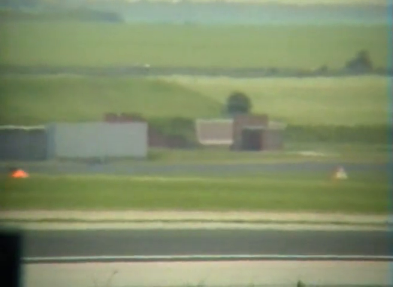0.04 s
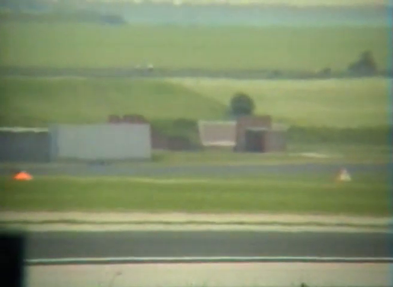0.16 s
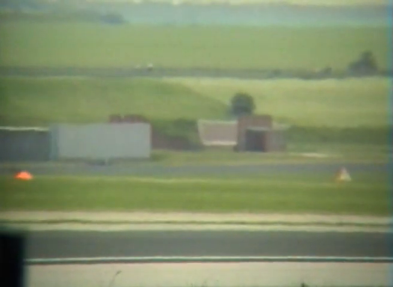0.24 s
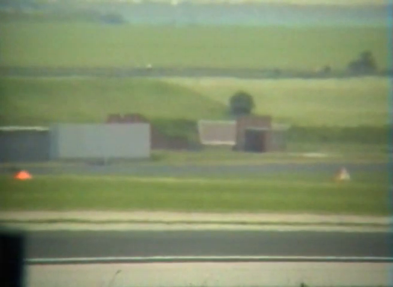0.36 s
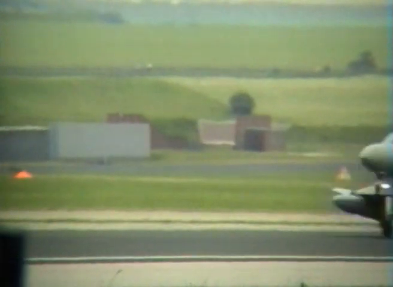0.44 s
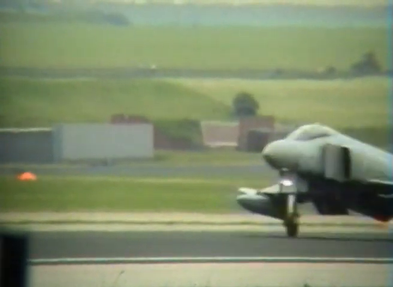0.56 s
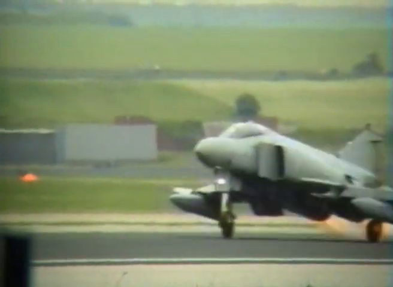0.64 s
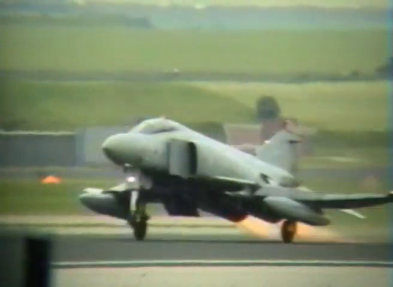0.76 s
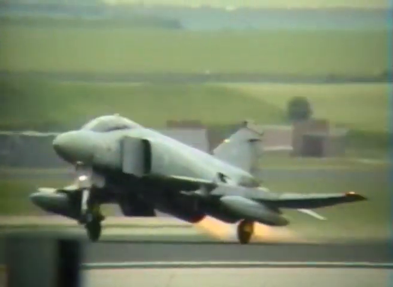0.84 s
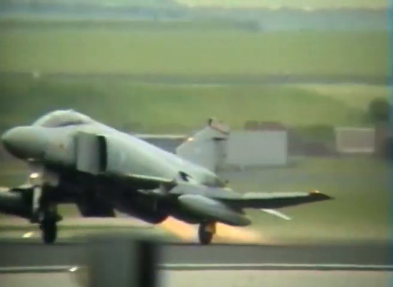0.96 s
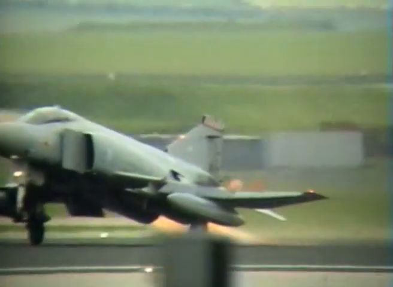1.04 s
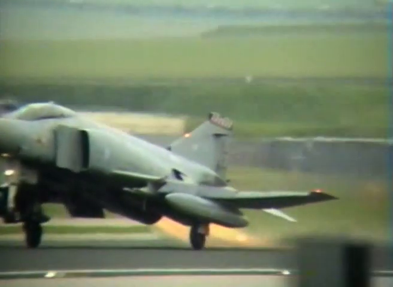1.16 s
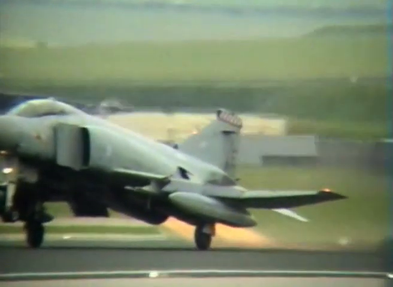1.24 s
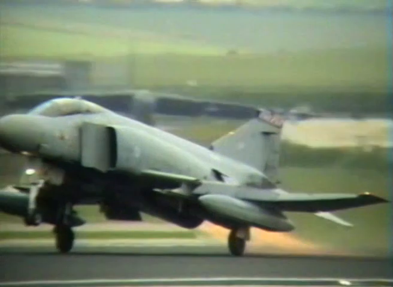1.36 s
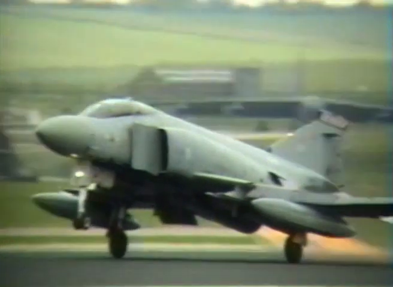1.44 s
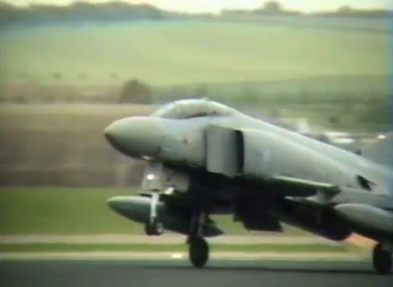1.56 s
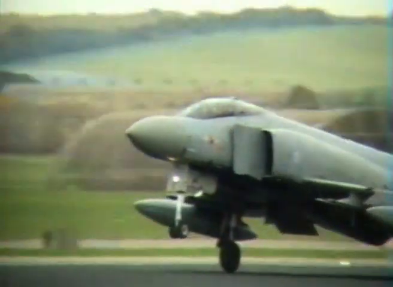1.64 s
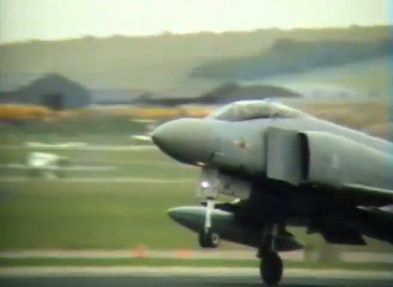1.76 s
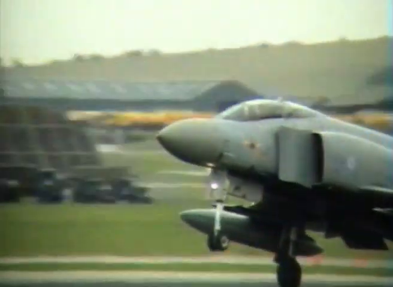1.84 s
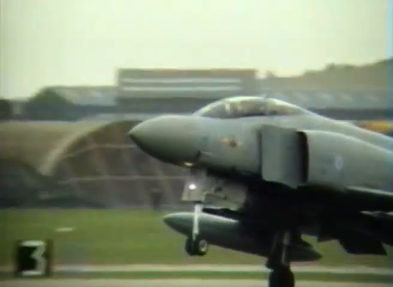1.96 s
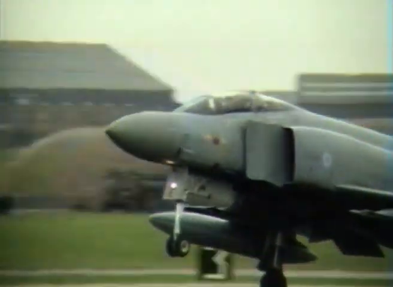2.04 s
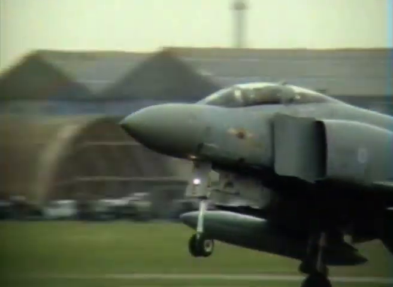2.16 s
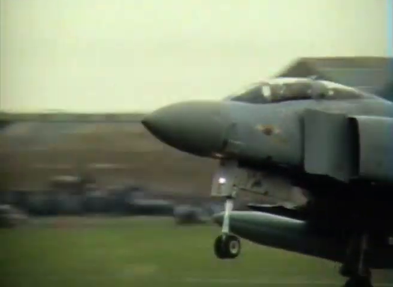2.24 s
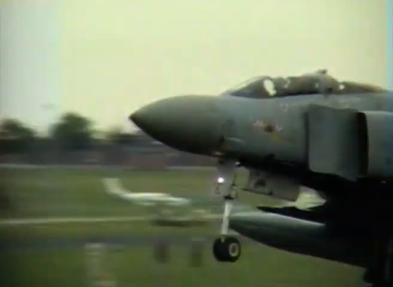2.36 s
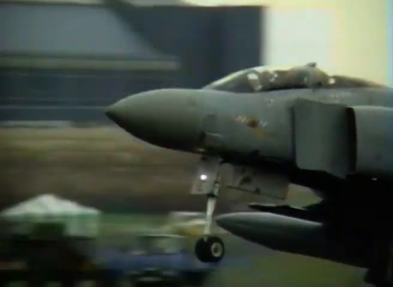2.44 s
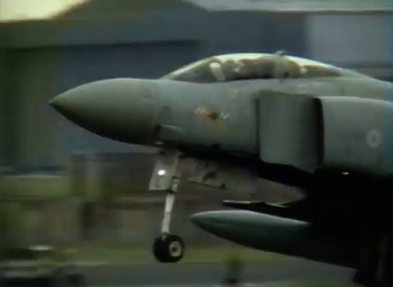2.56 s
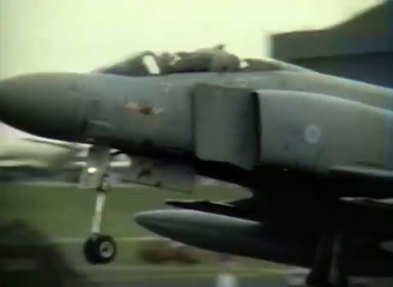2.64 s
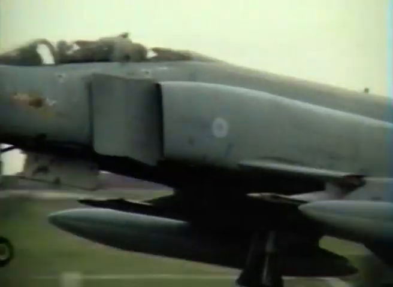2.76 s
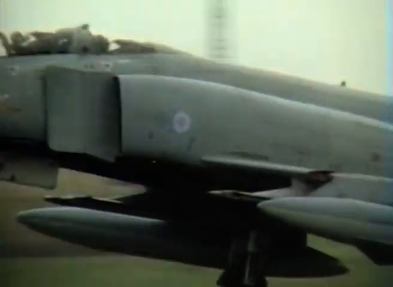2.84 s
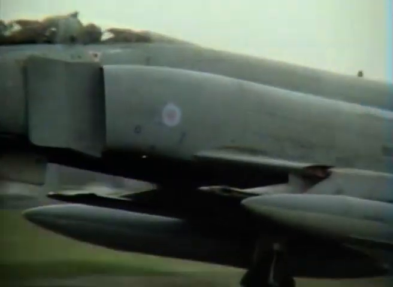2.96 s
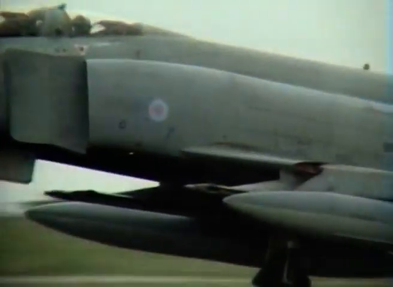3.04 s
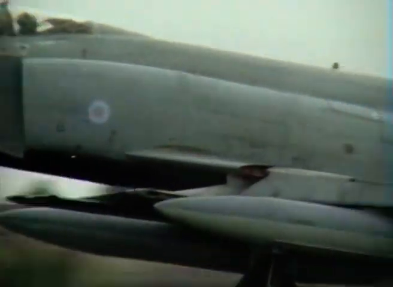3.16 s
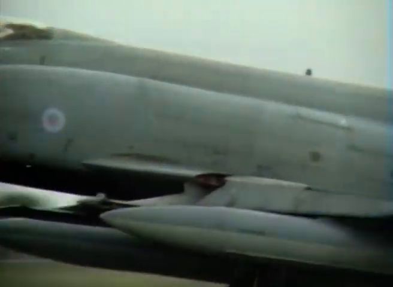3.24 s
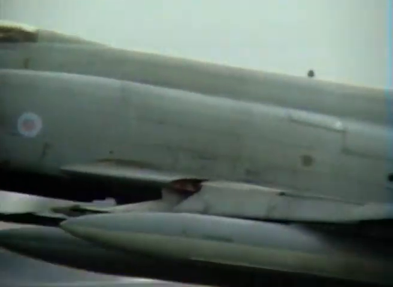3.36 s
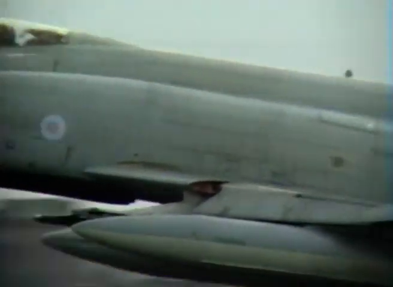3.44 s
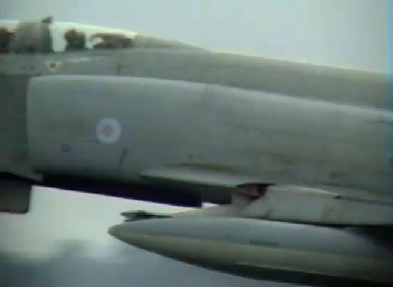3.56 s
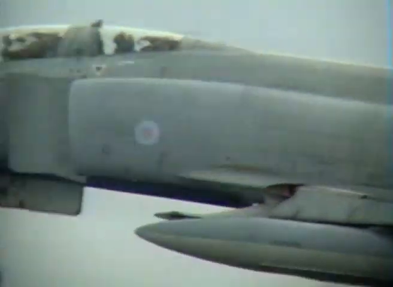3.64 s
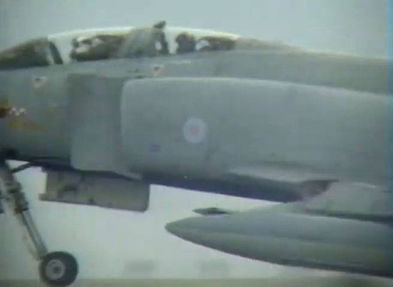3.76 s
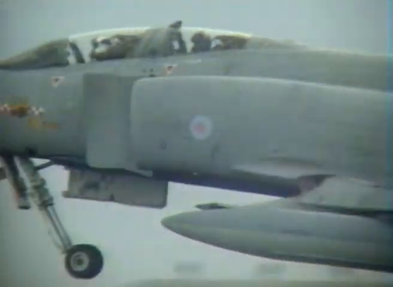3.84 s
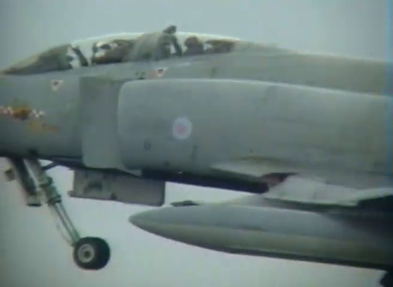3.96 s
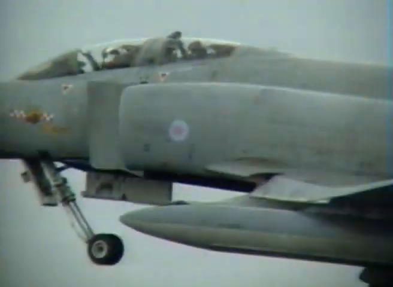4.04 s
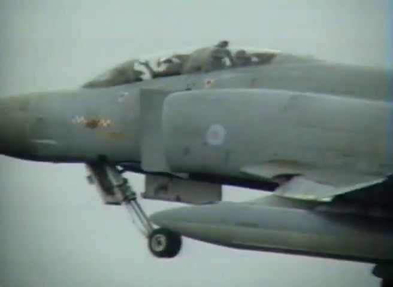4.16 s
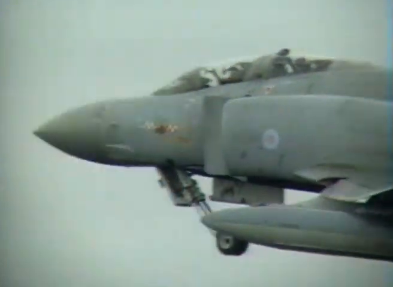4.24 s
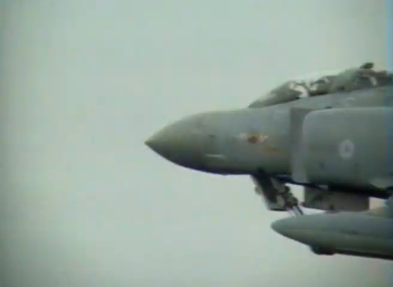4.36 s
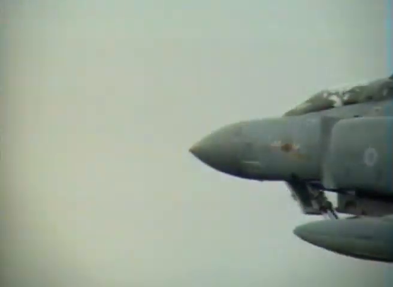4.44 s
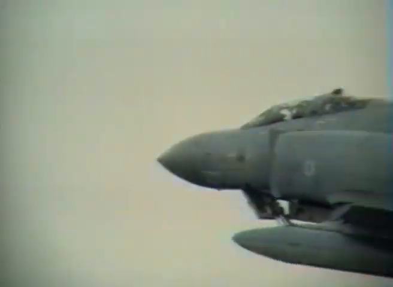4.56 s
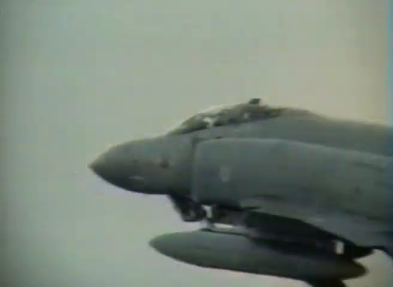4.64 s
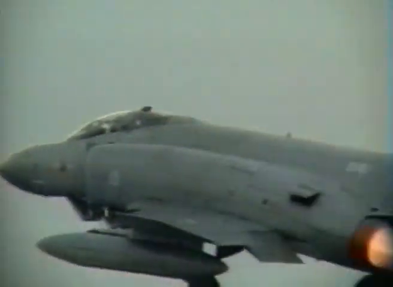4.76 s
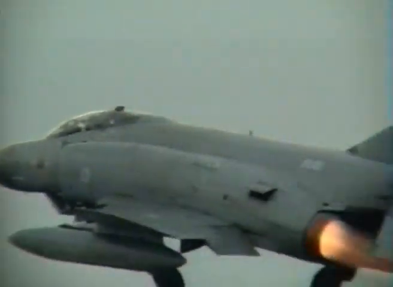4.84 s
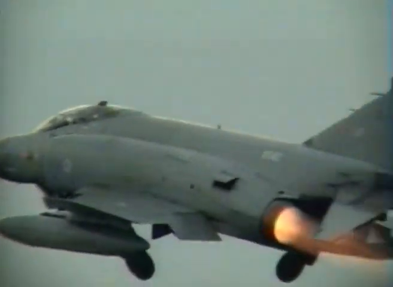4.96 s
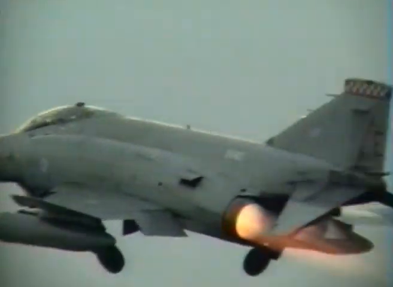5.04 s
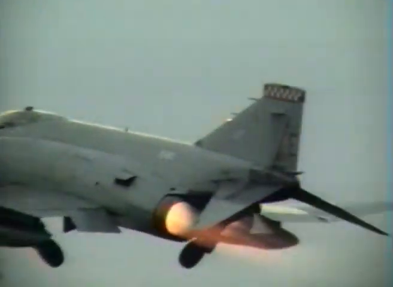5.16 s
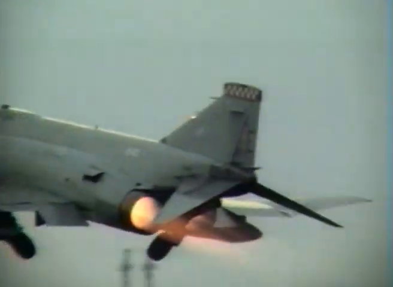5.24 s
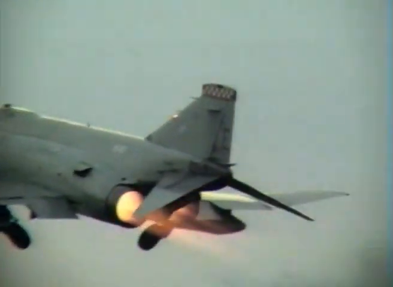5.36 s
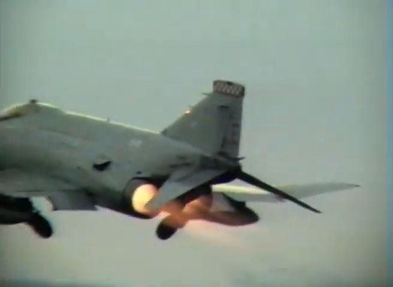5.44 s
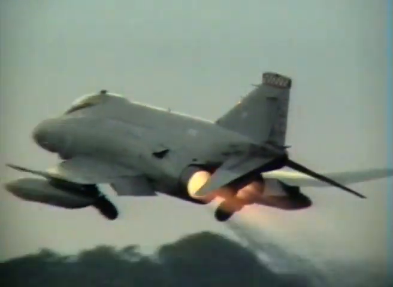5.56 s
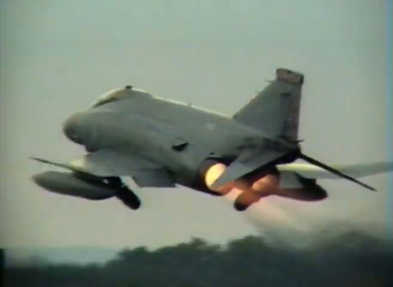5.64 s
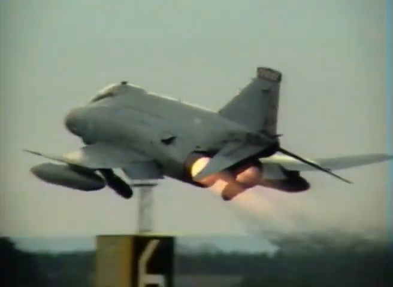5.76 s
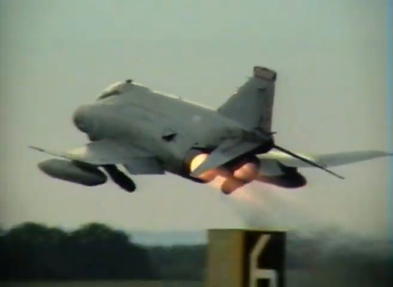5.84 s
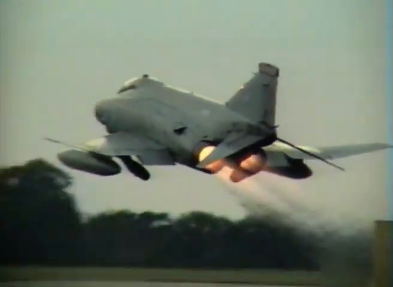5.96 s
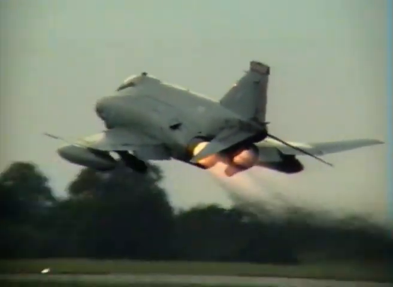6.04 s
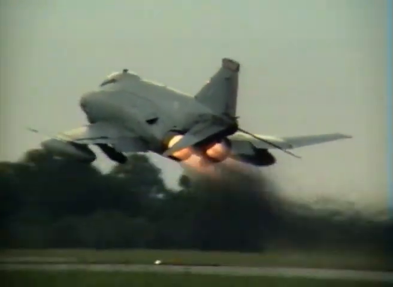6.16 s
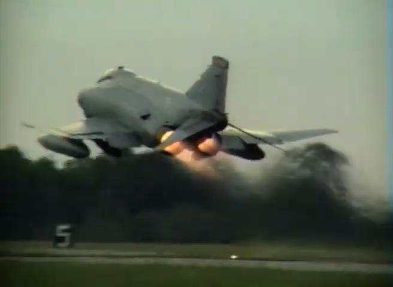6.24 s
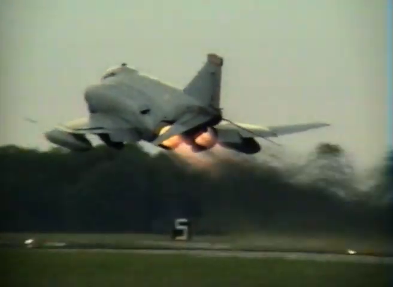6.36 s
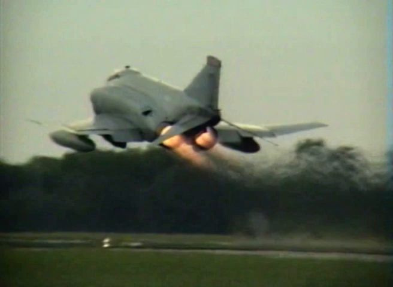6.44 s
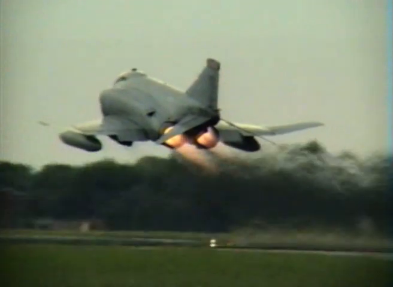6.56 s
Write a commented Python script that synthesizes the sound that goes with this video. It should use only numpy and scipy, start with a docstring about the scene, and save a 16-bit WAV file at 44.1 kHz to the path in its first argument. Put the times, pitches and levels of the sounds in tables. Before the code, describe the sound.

A fighter jet on afterburner takeoff swells from a thin distant rush to a huge crackling roar, passes close, then turns hollow and recedes.

```python
"""Afterburner take-off and close pass

A jet fighter takes off in afterburner, passes close by and climbs away. Filtered noise and random shocks
form the roar: thin ahead, full and crackling to the side and behind, hollow straight astern; it surges in
uneven air. The exhaust rumbles as low noise, an unsteady sine burner tone drops in pitch, mid-band noise
swells briefly and single shocks crack. Two spaced pickups, summed, comb the rumble, roar and cracks.
Steady low ambient rumble with faint hiss lies beneath; the recorder puts treble left, bass right."""
import sys
import numpy as np
from scipy import signal
from scipy.fft import rfft, irfft
from scipy.io import wavfile
from scipy.ndimage import map_coordinates

SR = 44100
rng = np.random.default_rng(int(sys.argv[2]) if len(sys.argv) > 2 else 0)


def persist_wave(psi):
    """Save psi, clipped to +-1, as 16-bit WAV."""
    counts = np.round(np.clip(psi, -1, 1) * 32767).astype(np.int16)
    wavfile.write(sys.argv[1], SR, np.atleast_2d(counts).T)


N = 291060
TIME_S = np.arange(N) / SR

# Rumble source spectrum: f/Hz, relative level/dB
RUMBLE_SPECTRUM = [(25, -39), (45, -27), (65, -25), (90, -1.5), (130, 3.5), (190, 3), (300, -2.5),
                   (480, -5), (590, -22.5), (900, -18.5), (2000, -65)]
# Rumble swells and lulls: t/s, length/s, level/dB
RUMBLE_SWELLS = [(1.65, .22, 1.5), (2.3, 0.61, -1), (3.82, 0.35, -7.5), (4.31, 0.081, 2.5),
                 (4.7, 0.038, 2.5), (4.95, .15, -1.5), (5.46, 0.047, 2.5), (5.61, 0.059, -3.5),
                 (6.3, 0.07, -4)]
# Roar source spectrum: f/Hz, relative level/dB
ROAR_SPECTRUM = [(200, -21), (480, -3.5), (640, -4), (850, -2.5), (1150, 0.5), (1550, 2), (2300, 2.5),
                 (3000, -0.24), (4000, -7.5), (5000, -16), (6500, -22), (9500, -28.5), (11200, -37.5),
                 (13500, -48)]
# Roar surges and lulls: t/s, length/s, level/dB, brightness/dB
ROAR_SURGES = [(1.1, 0.42, 2, -1.2), (2.05, 0.1, -1.5, 3.5), (2.33, 0.062, 2.5, -3), (2.65, 0.045, 3, 0.5),
               (2.77, 0.17, 5.5, 2), (3.16, 0.13, 3.5, -0.5), (3.28, 0.13, 5.5, 3.5),
               (3.375, 0.13, 0, -3.5), (3.65, 0.13, -3, 0), (3.755, 0.063, 2, 2.5), (3.9, 0.18, -5, -2.5),
               (4.01, 0.069, 1, -1.5), (4.11, 0.08, 2.5, -1), (4.22, .1, -1, 0.5), (4.35, 0.14, -3, 2.5),
               (4.51, 0.09, 2, 2.5), (4.69, 0.084, 4, 2.5), (4.99, 0.083, -4, 0.5), (5.26, 0.13, 2.5, 1),
               (5.46, 0.086, 4.5, 2.5), (5.57, 0.18, -3, -1), (5.73, 0.15, 4.5, 0), (5.97, 0.14, 2.5, 0)]
# Burner tone mean pitch: t/s, f/Hz
TONE_PITCH = [(0, 146.3), (2.75, 144.4), (3.0, 139.5), (3.3, 130.9), (3.7, 118.5), (4.1, 107.3),
              (4.45, 100), (5, 93)]
# Burner tone swells and fades: t/s, length/s, level/dB
TONE_SWELLS = [(.55, 0.51, -5), (1.22, .12, 5), (1.42, 0.12, -11), (1.68, 0.11, 6.5), (2.05, 0.046, 5),
               (2.18, .1, 3.5), (2.27, .03, -12), (2.34, 0.073, 8), (2.42, 0.048, -18), (2.5, 0.07, 6.5),
               (2.58, .05, -12), (2.67, .09, 14.5), (2.81, 0.15, 12.5), (3.11, 0.12, -10), (3.42, 0.1, -11),
               (3.7, 0.044, 4.5), (3.93, 0.062, 4), (4.17, 0.13, 4.5)]
# Brief swells of mid-band noise in the roar: t/s, length/s, centre f/Hz, level into recorder/dB
BAND_SWELLS = [(1.65, .25, 298, -44.5), (2.353, 0.42, 484, -41), (2.8, .3, 480, -39),
               (3.38, 0.13, 1420, -28.5), (4.005, .13, 1520, -27.5)]
# Strongest shocks: t/s, front pulse level/dB, body pulse level/dB
CRACK_PULSES = [(4.122, -13, -6), (4.1274, -18, -5), (4.133, -14, -1), (4.5047, 3, -13),
                (4.5616, -2.5, -10), (4.6791, -10, -5), (4.6999, -7, -2), (4.7288, -14, -4),
                (4.7482, -3, -3), (4.8514, -19, -14), (5.2479, -21, 1), (5.263, -14, -5), (5.3251, -24, -1),
                (5.3547, -20, -2), (5.4608, -23, -2), (5.689, -16, 2), (5.7403, -19, -1), (5.9478, -18, -7)]
# Crack front filter: f/Hz, gain/dB
CRACK_FRONT_FILTER = [(300, -21), (1200, 4), (2600, -6), (5000, 1), (8000, -1.5), (11000, -9), (14000, -27)]
# Crack body filter: f/Hz, gain/dB
CRACK_BODY_FILTER = [(40, -14), (120, 10), (400, 8), (700, -3), (1500, 3), (3000, 1), (5000, -14),
                     (12000, -44)]
# Steady background spectrum: f/Hz, relative level/dB
BACKGROUND_SPECTRUM = [(30, 4), (60, 22.5), (150, 7), (500, 4.5), (2000, 1.5), (5000, -6.5), (10000, -2.5),
                       (13500, -7.5)]

# Pass: time heard abeam; speed, acceleration and distance there
ABEAM_S, SPEED_M_S, ACCEL_M_S2, DISTANCE_M = 3.922, 91.4, 3.9, 100.5
SOUND_M_S = 343
# Pickups: spacing, skew to runway; share of the weaker one coming and going, angle of the change
SPACING_M, SKEW_DEG, SHARE_COMING, SHARE_GOING, SHARE_DEG = 0.2466, 11.4, 0.34, 0.61, 64
# Angles from the nose: start of aft lobe, start of quiet cone round the jet axis, cone edge width
AFT_DEG, CONE_DEG, CONE_EDGE_DEG = 135.4, 151.54, 1.7
# Shocks re smooth turbulence, ahead and behind; angle where they take over
CRACKLE_AHEAD_DB, CRACKLE_BEHIND_DB, CRACKLE_DEG = -9.5, 1.5, 92
TONE_LOST_DEG = 103
# Background rms ahead of the crossover; crossover; top cut
BACKGROUND_DB, CROSSOVER_HZ, TOP_HZ = -57, 673, 13600


def undb(db):
    """Decibels to gain."""
    return 10 ** (np.asarray(db) / 20)


def unit(x):
    """Scale to rms 1."""
    return x / np.sqrt(np.mean(x ** 2))


def step(x, width):
    """Smooth step from 0 to 1 as x passes zero."""
    return .5 + .5 * np.tanh(x / width)


def curve(table, axis=1):
    """One table column, joined by straight lines in time."""
    rows = np.array(table, float)
    return np.interp(TIME_S, rows[:, 0], rows[:, axis])


def swells(table, axis):
    """Sum of bell-shaped swells, each as wide at half height as its length."""
    return sum(row[axis] * .5 ** ((2 * (TIME_S - row[0]) / row[1]) ** 2) for row in table)


def walk(rate_hz):
    """Smooth random wandering of rms 1."""
    hz = np.arange(N // 2 + 1) * SR / N
    return unit(irfft(rfft(rng.standard_normal(N)) / (1 + (hz / rate_hz) ** 2), N))


def colour(x, spectrum, size=4096):
    """Causal minimum-phase filter through (Hz, dB) points; shocks keep their sharp fronts."""
    hz, db = np.transpose(spectrum)
    grid_hz = np.maximum(np.arange(size // 2 + 1) * SR / size, 1)
    gain = undb(np.interp(np.log(grid_hz), np.log(hz), db))
    # Fold the cepstrum onto positive time
    cepstrum = irfft(np.log(gain))
    cepstrum[1:size // 2] *= 2
    cepstrum[size // 2 + 1:] = 0
    impulse_response = irfft(np.exp(rfft(cepstrum)))
    return signal.fftconvolve(x, impulse_response)[:N]


def band(x, low_hz, high_hz):
    """Zero-phase band; neighbouring bands add up to the whole."""
    hz = np.arange(N // 2 + 1) * SR / N

    def below(edge_hz):
        return 1 / (1 + (hz / edge_hz) ** 8)

    return irfft(rfft(x) * (below(high_hz) - below(low_hz)), N)


def flight():
    """Distance/m, angle from the nose/deg and Doppler factor of the sound arriving at each moment."""
    sent_s = np.linspace(-7, 4, 3000)  # 0 = abeam
    along_m = SPEED_M_S * sent_s + ACCEL_M_S2 * sent_s ** 2 / 2
    metres = np.hypot(along_m, DISTANCE_M)
    heard_s = ABEAM_S + sent_s + (metres - DISTANCE_M) / SOUND_M_S
    angle_deg = np.degrees(np.arctan2(DISTANCE_M, -along_m))
    doppler = np.gradient(sent_s, heard_s)
    return [np.interp(TIME_S, heard_s, v) for v in (metres, angle_deg, doppler)]


def beam(side_db, ahead_db, opens_deg, edge_deg, aft_db=0, cone_db=0, loss_db_per_m=0):
    """Source gain: weak ahead, aft lobe, cone astern; spreading and air loss re abeam distance."""
    metres, angle_deg, _ = flight()
    db = side_db + ahead_db * step(opens_deg - angle_deg, edge_deg)
    db = db + aft_db * step(angle_deg - AFT_DEG, 4.8)
    db = db + cone_db * step(angle_deg - CONE_DEG, CONE_EDGE_DEG)
    return undb(db - loss_db_per_m * (metres - DISTANCE_M)) * DISTANCE_M / metres


def pickups(x, strength):
    """Sum of two spaced pickups: the lag passes zero near abeam and wavers with the air, sweeping a comb."""
    _, angle_deg, _ = flight()
    facing = np.cos(np.radians(angle_deg + SKEW_DEG))
    lag_samples = SR * SPACING_M / SOUND_M_S * facing * (1 + .015 * walk(8))
    share = SHARE_GOING + (SHARE_COMING - SHARE_GOING) * step(SHARE_DEG - angle_deg, 28)
    return x + strength * share * map_coordinates(x, [np.arange(N) - lag_samples], order=3)


def hail(shocks_per_s=600, spread_db=4.5):
    """One-sided shocks of uneven size, arriving at random."""
    arrivals = rng.random(N) < shocks_per_s / SR
    return arrivals * undb(spread_db * np.minimum(rng.standard_normal(N), 2))


def roughen(turbulence, shocks, shock_db):
    """Blend of smooth turbulence and shocks, the shocks gaining weight behind the jet."""
    _, angle_deg, _ = flight()
    behind = step(angle_deg - CRACKLE_DEG, 17)
    share = undb(shock_db + CRACKLE_AHEAD_DB + (CRACKLE_BEHIND_DB - CRACKLE_AHEAD_DB) * behind)
    return (unit(turbulence) + share * unit(shocks)) / np.hypot(1, share)


def rumble(shocks, doppler_share=.18, deep_hz=175):
    """Large eddies far down the plume, pitch lowered a little by the pass, with thudding shocks."""
    _, _, doppler = flight()
    eddies = colour(rng.standard_normal(N), RUMBLE_SPECTRUM)
    read_at = np.cumsum(doppler ** doppler_share)
    eddies = map_coordinates(eddies, [read_at], order=3, mode="mirror")
    eddies = roughen(eddies, colour(shocks, RUMBLE_SPECTRUM), shock_db=-2.5)
    eddies = unit(pickups(eddies, strength=0.88))
    deep = band(eddies, 20, deep_hz)
    # The deep part loses most astern
    deep_gain = beam(side_db=-25, ahead_db=-14, opens_deg=24, edge_deg=5.8, aft_db=1.5, cone_db=-6)
    upper_gain = beam(side_db=-26.0, ahead_db=-14, opens_deg=25.7, edge_deg=7.7,
                      aft_db=3.0, cone_db=-3.5)
    plume = deep * deep_gain + (eddies - deep) * upper_gain
    return plume * undb(swells(RUMBLE_SWELLS, axis=2))


def roar(shocks, steepening=1.5, flutter_db=0.7, split_hz=1800, front_hz=4800, tear_hz=8000):
    """Fine turbulence and a hail of one-sided shocks; stronger shocks have steeper, brighter fronts."""
    turbulence = rng.standard_normal(N)
    surge = undb(swells(ROAR_SURGES, axis=2) + flutter_db * walk(12.4))
    bright = undb(swells(ROAR_SURGES, axis=3))

    def radiate(low_hz, high_hz, shock_db, power, strength):
        """Turbulence plus shocks in one band, through both pickups."""
        pressure = roughen(turbulence, shocks ** power, shock_db)
        return pickups(unit(band(colour(pressure, ROAR_SPECTRUM), low_hz, high_hz)), strength)

    mixing = radiate(220, split_hz, shock_db=-4.0, power=0.69, strength=0.85)
    mixing = mixing * beam(side_db=-29.5, ahead_db=-8.5, opens_deg=29.6, edge_deg=4.2,
                           aft_db=4.5, cone_db=-13.5, loss_db_per_m=0.0345)
    shock_noise = radiate(split_hz, front_hz, shock_db=1.0, power=0.55, strength=0.9)
    shock_noise = shock_noise * beam(side_db=-25.5, ahead_db=-8.0, opens_deg=29.6, edge_deg=7.8,
                                     aft_db=3.0, cone_db=-10.5, loss_db_per_m=0.0544)
    fronts = radiate(front_hz, tear_hz, shock_db=0.0, power=steepening, strength=0.32)
    fronts = fronts * beam(side_db=-46, ahead_db=-7, opens_deg=40, edge_deg=36,
                           aft_db=2.5, cone_db=-1.5, loss_db_per_m=0.08)
    tearing = radiate(tear_hz, TOP_HZ, shock_db=3.0, power=steepening, strength=0.13)
    tearing = tearing * beam(side_db=-51.5, ahead_db=-11.5, opens_deg=77, edge_deg=17,
                             aft_db=-1.5, cone_db=-21, loss_db_per_m=0.08)
    return surge * (mixing / bright + shock_noise + (fronts + tearing) * bright)


def burner_tone():
    """Afterburner low resonance: unsteady sine, lowered by the pass, lost in the rumble behind the jet."""
    _, angle_deg, _ = flight()
    pitch_hz = curve(TONE_PITCH) * (1 + .004 * walk(20))
    tone = unit(np.sin(2 * np.pi * np.cumsum(pitch_hz) / SR) * undb(walk(29)))
    gain = beam(side_db=-29.5, ahead_db=-15.0, opens_deg=23.2, edge_deg=3.6)
    gain = gain * step(TONE_LOST_DEG - angle_deg, 15)
    return tone * gain * undb(swells(TONE_SWELLS, axis=2))


def band_swells(width=.2):
    """Brief swells of mid-band noise in the roar."""
    air = rng.standard_normal(N)
    total = np.zeros(N)
    for at_s, length_s, hz, db in BAND_SWELLS:
        noise = unit(band(air, hz / (1 + width), hz * (1 + width)))
        total += noise * undb(db) * swells([(at_s, length_s, 1)], axis=2)
    return total


def cracks():
    """Single shocks that stand out of the crackle: a sharp front on a thudding body."""
    times_s, *db = np.transpose(CRACK_PULSES)
    pulses = np.zeros((2, N))
    pulses[:, (times_s * SR).astype(int)] = undb(db)
    front = colour(pulses[0], CRACK_FRONT_FILTER)
    body = colour(pulses[1], CRACK_BODY_FILTER)
    return pickups(front + body, strength=0.4)


def scene():
    """The whole jet, the same in both channels; rumble and roar share their shocks."""
    shocks = hail()
    jet = rumble(shocks) + roar(shocks) + burner_tone() + band_swells() + cracks()
    return np.array([jet, jet])


def record(dry):
    """Add steady background; first-order split, treble left, inverted bass right; round peaks; cut the top."""
    background = undb(BACKGROUND_DB) * unit(colour(rng.standard_normal(N), BACKGROUND_SPECTRUM))
    sound = dry + background
    bass = signal.sosfilt(signal.butter(1, CROSSOVER_HZ, fs=SR, output="sos"), sound)
    split = 2 * np.array([sound[0] - bass[0], -bass[1]])
    rounded = split / (1 + (split / .8) ** 6) ** (1 / 6)  # limit 0.8
    return signal.sosfilt(signal.ellip(10, .2, 70, TOP_HZ, fs=SR, output="sos"), rounded)


dry = scene()
out = record(dry)
persist_wave(out)
```